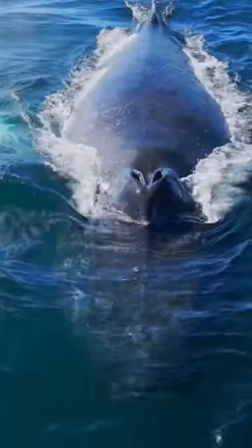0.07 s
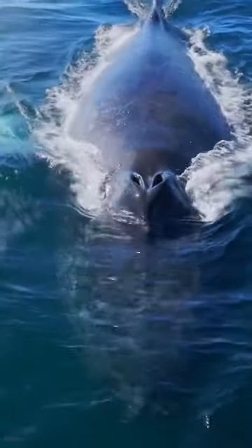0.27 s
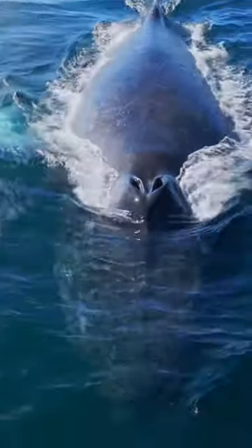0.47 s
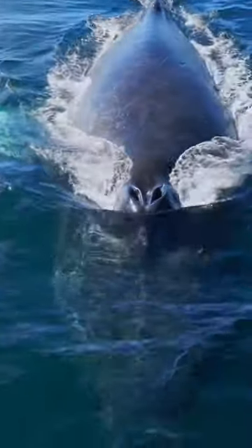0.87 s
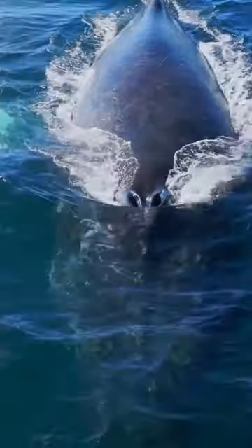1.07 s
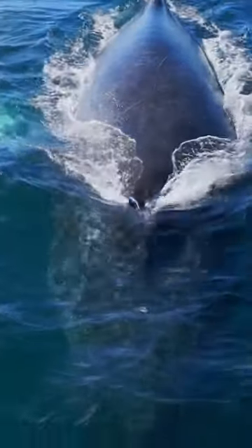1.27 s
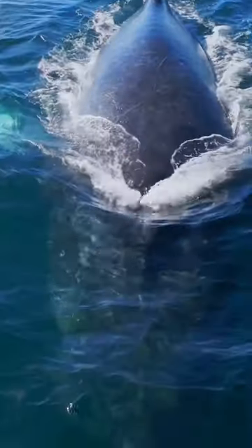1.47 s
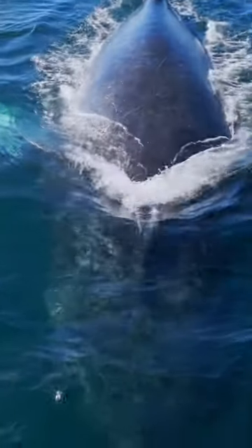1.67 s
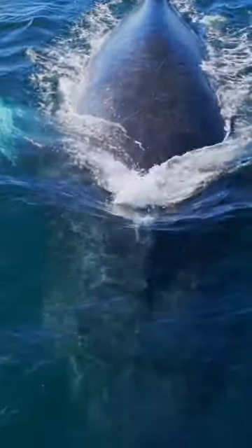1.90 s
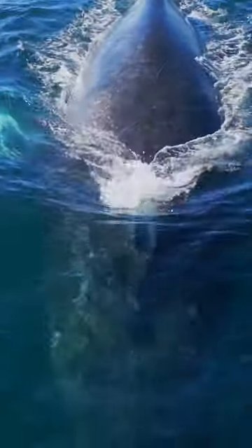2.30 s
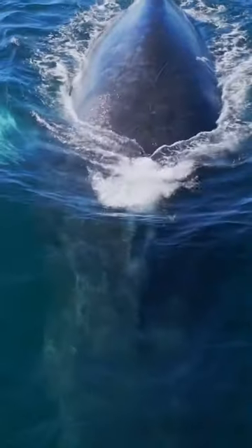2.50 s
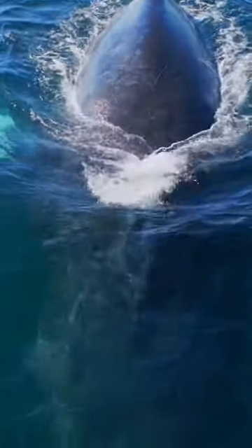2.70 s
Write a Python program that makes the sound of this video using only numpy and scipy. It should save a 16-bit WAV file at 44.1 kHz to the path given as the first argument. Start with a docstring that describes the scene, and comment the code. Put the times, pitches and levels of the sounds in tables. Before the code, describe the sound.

A whale rumbles deeply at the sea surface amid washing water and hissing spray.

```python
"""A whale rumbles, probably through its blowholes, as its head dips at the sea surface.
At first spray hisses away and bubbling water washes over the head, above low wind and boat noise.
The deep rumble grows as soft tissue flutters, slapping shut and ringing the airway, then shuts off.
The bow waves meet over the head with a splash and leave fizzing foam."""
import sys
import numpy as np
from scipy import signal
from scipy.fft import rfft, irfft
from scipy.io import wavfile
from scipy.ndimage import uniform_filter1d

SR = 44100
rng = np.random.default_rng(int(sys.argv[2]) if len(sys.argv) > 2 else 0)


def master_out(mix):
    """Clip the mix to full scale and print it as 16-bit PCM to the path in sys.argv[1]."""
    frames = np.transpose(np.atleast_2d(mix))
    ceiling = np.clip(frames, -1, 1)
    pcm = np.round(ceiling * 32767).astype(np.int16)
    wavfile.write(sys.argv[1], SR, pcm)


N = 125685
T = np.arange(N) / SR


def amp(db):
    """Turns decibels into a gain."""
    return 10 ** (np.asarray(db) / 20)


def unit(x):
    """Scales a signal to an average strength (rms) of 1."""
    return x / np.sqrt(np.mean(x ** 2) + 1e-20)


def curve(rows, column=1):
    """One column of a time table, joined by straight lines."""
    rows = np.array(rows)
    return np.interp(T, rows[:, 0], rows[:, column])


def wander(*windows):
    """Slow random movement: noise smoothed over each window length in turn (in samples)."""
    x = rng.standard_normal(N)
    for size in windows:
        x = uniform_filter1d(x, size)
    return unit(x)


def noise(colour, alike, patchy_db):
    """Stereo noise with flickering patches; colour sets its lows and highs, alike=1 makes it mono."""
    spectrum = signal.stft(rng.standard_normal((2, N)), nperseg=512, noverlap=384)[2]
    patches = uniform_filter1d(rng.standard_normal(spectrum.shape[1:]), size=9, axis=0)
    patches = unit(uniform_filter1d(patches, size=14, axis=1))
    white = signal.istft(spectrum * amp(patchy_db * patches), nperseg=512, noverlap=384)[1][:, :N]
    colour_hz, colour_db = np.transpose(colour)
    hz = np.fft.rfftfreq(N, 1 / SR)
    gain = amp(np.interp(np.log(hz + 1), np.log(colour_hz), colour_db))
    mid, side = irfft(rfft(white) * gain, N)
    side *= np.sqrt((1 - alike) / (1 + alike))
    return unit(np.array([mid + side, mid - side]))


def bubbles(low_hz, high_hz, cycles, per_s, spread_db, glide, width, sizes=30):
    """Bubbles of many sizes ring at random, each rising in pitch, scattered left and right."""
    out, t = np.zeros((2, N)), T[:2048]
    for hz in np.geomspace(low_hz, high_hz, sizes):
        age = t * hz / cycles
        level = np.exp(-age) * (1 - np.exp(-2 * t * hz)) * np.sqrt(low_hz / hz)
        ring = level * np.sin(2 * np.pi * hz * t * (1 + glide * np.minimum(age, 10)))
        starts = rng.random(N) < per_s / sizes / SR
        hits = starts * amp(spread_db * np.minimum(rng.exponential(1, N), np.pi))
        pan = width * rng.uniform(-1.1, 1, N)
        out += signal.oaconvolve(hits * np.array([1 + pan, 1 - pan]), ring[None], axes=1)[:, :N]
    return unit(out)


# How loud the wind is (time [s], level [dB])
WIND_LEVEL = [(0, -28.5), (.25, -27), (.55, -30), (.68, -31), (.82, -26.5), (1.3, -24), (1.7, -31),
              (2.3, -28.5), (2.56, -26), (2.68, -33.5), (2.85, -43)]
# Its lows and highs (frequency [Hz], relative level [dB])
WIND_COLOUR = [(15, -9), (30, 0), (70, -1.5), (130, -2), (200, -1), (300, -5), (450, -9.5), (1000, -41),
               (4000, -78)]


def wind_and_boat():
    """Low wind swells slowly over a boat's faint, wavering hum."""
    boat_hz, boat_db = 67.06, -40.5
    pitch = boat_hz * (1 + 0.0574 * wander(3000))
    hum = amp(boat_db) * np.sqrt(2) * np.sin(2 * np.pi * np.cumsum(pitch) / SR)
    return hum + amp(curve(WIND_LEVEL)) * noise(WIND_COLOUR, alike=1, patchy_db=1)


# How loud the spray is (time [s], level [dB])
SPRAY_LEVEL = [(0, -38), (.2, -37.5), (.33, -36), (.45, -39.5), (.55, -42), (.68, -46.5), (.8, -44.5),
               (1.0, -48), (1.3, -55), (1.7, -55.5), (2.85, -63)]
# Its lows and highs (frequency [Hz], relative level [dB])
SPRAY_COLOUR = [(200, 11), (700, -35), (1500, 0), (3000, 0.5), (5000, -1), (7500, -5.5), (10000, -7.5),
                (13000, -12.5), (16000, -20)]


def spray():
    """Fine spray hisses on both sides and dies away."""
    return amp(curve(SPRAY_LEVEL)) * noise(SPRAY_COLOUR, alike=0.014, patchy_db=1)


# How loud the churning water is (time [s], level [dB])
WASH_LEVEL = [(0, -29), (.22, -25.5), (.42, -24), (.6, -25.5), (.7, -26), (.83, -22), (.95, -25.5),
              (1.05, -24.5), (1.3, -27), (1.6, -25), (1.9, -28.5), (2.12, -25), (2.3, -31), (2.5, -30.5),
              (2.64, -29), (2.85, -34)]
# Its lows and highs (frequency [Hz], relative level [dB])
WASH_COLOUR = [(30, -7), (100, -3), (200, -0.5), (300, -0.5), (400, -0.5), (480, -3), (590, -1.5),
               (720, -5.5), (1000, -9.5), (1500, -16), (2500, -26.5), (4500, -45), (9000, -62),
               (16000, -72)]
# How alike it sounds left and right (time [s], likeness [0-1])
WASH_ALIKE = [(0, 0.83), (.45, 0.98), (.7, 0.98), (1.3, 1), (2.4, 0.99), (2.85, 0.97)]


def wash():
    """Water churns over the head, with faint bubbles ringing in it."""
    bubbling = bubbles(470, 2740, cycles=5.6, per_s=200, spread_db=9.5, glide=0.026, width=0.11)
    churn = noise(WASH_COLOUR, alike=curve(WASH_ALIKE), patchy_db=1)
    return amp(curve(WASH_LEVEL)) * (churn + amp(-22) * bubbling)


# How loud the sliding water is (time [s], level [dB])
RUSH_LEVEL = [(0, -39.5), (.22, -47), (.39, -46), (.5, -40), (.62, -37), (.9, -37), (1.03, -35.5),
              (1.3, -37.5), (1.7, -39), (2.05, -39.5), (2.15, -39), (2.3, -40.5), (2.62, -38),
              (2.85, -38.5)]
# Its lows and highs (frequency [Hz], relative level [dB])
RUSH_COLOUR = [(300, -28), (700, -0.5), (1100, 4.5), (2000, -3), (3000, -8.5), (4000, -12.5), (5500, -37),
               (9000, -27), (16000, -43)]


def rush():
    """A sheet of water slides up the head, brighter than the wash."""
    return amp(curve(RUSH_LEVEL)) * noise(RUSH_COLOUR, alike=1, patchy_db=1.54)


# One surge of water (time [s], level [dB], hollow pitch [Hz])
SURGE_SHAPE = [(.2, -62, 750), (.39, -34, 900), (.5, -39, 1040), (.62, -35, 1250), (.78, -37, 1650),
               (.94, -36, 1950), (1.01, -50, 2000), (1.15, -62, 2000)]
# Its lows and highs before it is made hollow (frequency [Hz], relative level [dB])
SURGE_COLOUR = [(200, -10), (700, 3), (3000, -2.5), (5000, -12), (16000, -30)]


def surge():
    """A hollow whoosh rises in pitch as the water closes over the head."""
    water = noise(SURGE_COLOUR, alike=0.91, patchy_db=0.5)
    for _ in range(2):
        water = resonate(water, curve(SURGE_SHAPE, column=2), width_hz=1200)
    return amp(curve(SURGE_SHAPE)) * unit(water)


def resonate(x, hz, width_hz):
    """Makes a sound hollow by favouring a band around the moving pitch hz."""
    spin = np.exp(2j * np.pi * np.cumsum(hz) / SR)
    feedback = np.exp(-np.pi * width_hz / SR)
    return 2 * (spin * signal.lfilter([1 - feedback], [1, -feedback], x / spin)).real


# How loud the fizz and the droplets each are (time [s], level [dB])
FOAM_LEVEL = [(0, -54), (.55, -50.5), (.8, -45.5), (1.0, -50), (1.35, -51), (1.65, -49.5), (1.83, -47.5),
              (2.17, -45), (2.28, -48.5), (2.5, -45), (2.58, -48.5), (2.72, -46.5), (2.85, -48.5)]
# The fizz's lows and highs (frequency [Hz], relative level [dB])
FOAM_COLOUR = [(400, -28), (1500, -12), (3000, -1.5), (5000, -1), (7500, -8.5), (11800, -15), (12600, -21),
               (16000, -44)]


def foam():
    """Foam fizzes while tiny droplets burst in it."""
    drops = bubbles(2104, 7100, cycles=3.2, per_s=900, spread_db=1.5, glide=0.0061, width=0.87)
    fizz = noise(FOAM_COLOUR, alike=0.13, patchy_db=1.5)
    return amp(curve(FOAM_LEVEL)) * (fizz + drops)


# How fast the tissue flutters (time [s], rate [Hz])
FLUTTER_RATE = [(.8, 27.43), (1.18, 26.35), (1.41, 25.25), (1.6, 23.93), (1.81, 23.35), (2.02, 22.66),
                (2.33, 23.5), (2.45, 24.1), (2.55, 25.31)]
# Tones at 1 to 5 times that rate; even ones lead, then odd ones (time [s], five levels [dB])
RUMBLE_TONES = [(.7, -70, -65, -70, -65, -70), (.88, -42, -29.5, -44, -30, -38),
                (1.05, -31.5, -26.5, -57, -30, -54), (1.33, -18.5, -17, -26.5, -34, -33),
                (1.5, -13.5, -21, -23.5, -41, -40), (1.62, -11, -28, -18.5, -27, -32),
                (1.78, -11.5, -34, -14.5, -25.5, -29), (1.92, -11, -43, -16, -28, -34),
                (2.1, -13, -39, -14, -42, -30.5), (2.38, -12.7, -31, -14, -26, -23.5),
                (2.48, -20, -20, -15, -32, -20), (2.535, -23.5, -40, -46, -35, -26.5),
                (2.6, -45, -65, -65, -60, -60), (2.66, -70, -70, -74, -78, -74)]


def rumble():
    """Soft tissue flutters slowly, making deep tones, hollow rings, puffs of air and slaps."""
    jitter_cycles, waver_db = 0.00067, 0.13
    cycles = np.cumsum(curve(FLUTTER_RATE)) / SR + jitter_cycles * wander(2000, 1200)
    tone = amp(curve(RUMBLE_TONES)) * np.sin(2 * np.pi * cycles)
    for k in range(2, 6):
        level_db = curve(RUMBLE_TONES, column=k) + waver_db * k * wander(2000, 1200)
        tone -= amp(level_db) * np.cos(2 * np.pi * k * cycles)
    return np.sqrt(2) * (tone + hollow_rings()) + flutter(cycles)


# How loud the airway rings (time [s], low ring [dB], middle ring [dB], high ring [dB])
RING_LEVELS = [(.7, -78, -72, -70), (.87, -41, -62, -60), (1.02, -28.5, -45, -61), (1.28, -24.5, -38, -45),
               (1.45, -39, -37, -52), (1.58, -29.5, -45, -22.5), (1.67, -33, -41, -31),
               (1.78, -30.5, -27.5, -34), (1.95, -32, -35, -31), (2.08, -33, -31, -32),
               (2.2, -35, -26.5, -29.5), (2.28, -31, -28, -47), (2.36, -38, -42, -30.5),
               (2.5, -38, -37, -59), (2.62, -70, -66, -73)]


def hollow_rings():
    """The airway rings at three slightly wandering pitches."""
    out = np.zeros(N)
    for column, hz in enumerate([237.4, 303, 372.8], start=1):
        pitch = hz * (1 + .017 * wander(900))
        out += amp(curve(RING_LEVELS, column)) * np.sin(2 * np.pi * np.cumsum(pitch) / SR)
    return out


# How loud the puffs and slaps are (time [s], level [dB])
FLUTTER_LEVEL = [(.65, -56), (.82, -26.5), (.95, -34), (1.2, -38.5), (1.33, -27), (1.5, -24.5),
                 (1.78, -25.5), (2.2, -28.5), (2.38, -27), (2.49, -21.5), (2.57, -38), (2.66, -53)]
# The air's lows and highs (frequency [Hz], relative level [dB])
AIR_COLOUR = [(40, -48), (100, -18), (150, -8.5), (200, -3.5), (240, -1), (300, -1.5), (380, -3),
              (425, -26), (460, -5), (510, -19.5), (600, -14), (1000, -35.5), (3000, -70)]


def flutter(cycles):
    """Once a cycle, air puffs out and the tissue slaps shut."""
    puff_at, puff_width = .42, 0.1  # in cycles
    puff_share = 0.45  # the rest of the air flows steadily
    from_puff = (cycles - puff_at + .5) % 1 - .5
    puff = np.exp(-.5 * (from_puff / puff_width) ** 2)
    power = 1 - puff_share + puff_share * puff / puff.mean()
    air = noise(AIR_COLOUR, alike=1, patchy_db=0.5) * np.sqrt(power)
    return amp(curve(FLUTTER_LEVEL)) * (air + slaps(cycles - puff_at))


def slaps(cycles):
    """Each slap of the tissue rings the airway, never quite evenly in time or strength."""
    jitter_cycles, spread_db, boost_db = .015, 3, 1
    count = np.floor(np.maximum.accumulate(cycles + jitter_cycles * wander(1500)))
    strength = amp(boost_db + spread_db * np.clip(rng.standard_normal(N), -2, 2))
    hits = np.diff(count, prepend=count[0]) * strength
    return signal.oaconvolve(hits, airway(T[:6000]))[:N]


# The notes of the slapped airway (pitch [Hz], relative level [dB], time to fade by 60 dB [s])
AIRWAY_NOTES = [(197, -7, 0.085), (296, 2, 0.027), (380, -3, 0.032), (566, -20, 0.02)]


def airway(t, rise_s=.0021):
    """The ring of the airway, t seconds after a soft slap."""
    notes = sum(amp(db - 60 * t / fade) * np.sin(2 * np.pi * hz * t) for hz, db, fade in AIRWAY_NOTES)
    return notes * (1 - np.exp(-(t / rise_s) ** 2))


# Single harder slaps in the rumble (time [s], strength [dB])
HARD_SLAPS = [(1.294, -5), (1.415, -11), (1.54, -12), (1.622, -10), (1.707, -10), (1.753, -6), (1.922, -11),
              (1.965, -8), (2.056, -9), (2.185, -7), (2.359, -10), (2.441, -9), (2.482, -2), (2.509, -13),
              (2.526, -13), (2.544, -14)]


def hard_slaps():
    """Harder slaps ring the airway, crowding together as the rumble shuts off."""
    return sum(amp(db) * airway(np.maximum(T - start, 0)) for start, db in HARD_SLAPS)


# Bursts of splashing (peak time [s], level [dB], rise [s], fall [s])
SPLASH_BURSTS = [(1.818, -32, .002, 0.0044), (1.84, -32, .003, 0.0054), (1.892, -30.5, 0.022, 0.017),
                 (1.912, -28, 0.004, 0.0072), (1.932, -34.5, .01, 0.05), (2.455, -47, 0.018, .03),
                 (2.522, -40, 0.004, .005)]
# Their lows and highs (frequency [Hz], relative level [dB])
SPLASH_COLOUR = [(400, 6.5), (1200, 7.5), (1900, 1.5), (2700, 5), (3600, 3), (4500, -6), (5200, 0),
                 (5900, -14), (7000, -15), (9000, -32), (16000, -48)]


def splash():
    """The two bow waves, pushed up by the head, slap together."""
    level = sum(amp(db) * np.exp(-np.maximum((peak - T) / rise, (T - peak) / fall))
                for peak, db, rise, fall in SPLASH_BURSTS)
    return level * noise(SPLASH_COLOUR, alike=0.6, patchy_db=3.5)


# Single big bubbles (time [s], starting pitch [Hz], strength [dB])
BIG_BUBBLES = [(2.012, 1400, -20), (2.483, 1090, -22)]


def plops(rise_s=.003, fall_s=0.0063, glide=3):
    """Two big bubbles ring out of the wash, rising slightly in pitch."""
    out = np.zeros(N)
    for start, hz, db in BIG_BUBBLES:
        t = np.maximum(T - start, 0)
        level = amp(db) * (1 - np.exp(-t / rise_s)) * np.exp(-t / fall_s)
        out += level * np.sin(2 * np.pi * hz * t * (1 + glide * t))
    return out


def to_right(x, db):
    """Tilts a sound so the right side is db louder than the left."""
    return x * amp([[-db / 2], [db / 2]])


def scene():
    """Whale, water, wind and boat together in the open air."""
    whale = rumble() + hard_slaps()
    water = wash() + rush() + surge() + plops()
    white_water = to_right(foam() + spray(), db=0.8) + to_right(splash(), db=4)
    return whale + water + white_water + wind_and_boat()


def record(dry):
    """The recorder cuts off the very highest treble."""
    cutoff_hz = 15750
    lowpass = signal.firwin(511, cutoff_hz, window=("kaiser", 9), fs=SR)
    return signal.oaconvolve(dry, lowpass[None], "same")


dry = scene()
out = record(dry)
master_out(out)
```